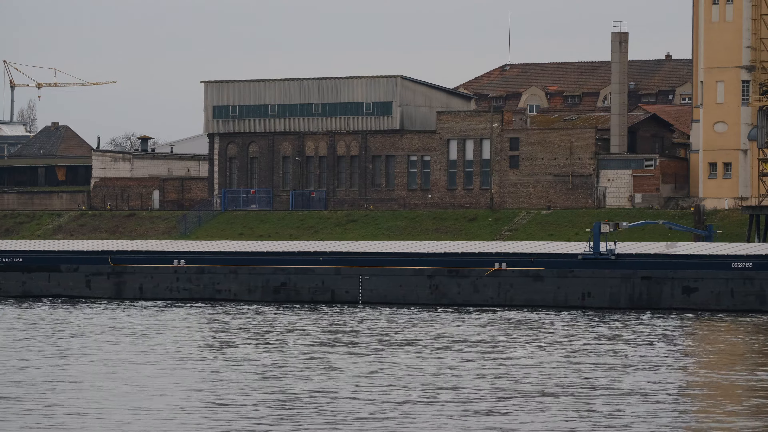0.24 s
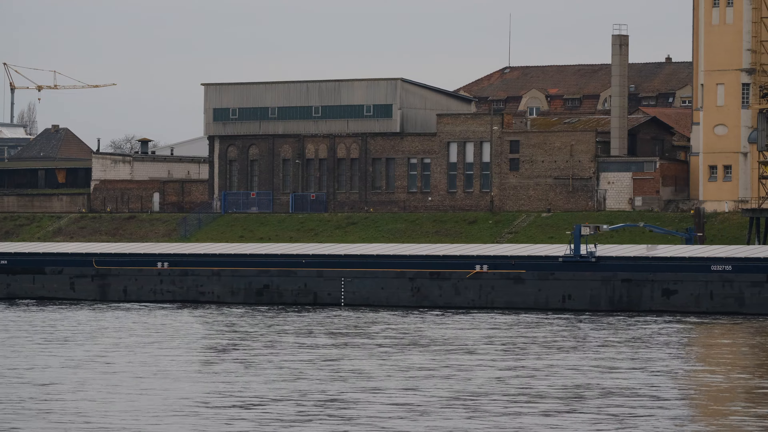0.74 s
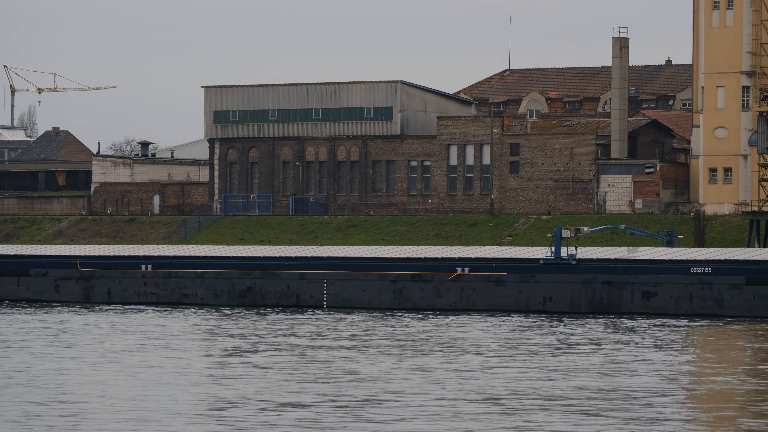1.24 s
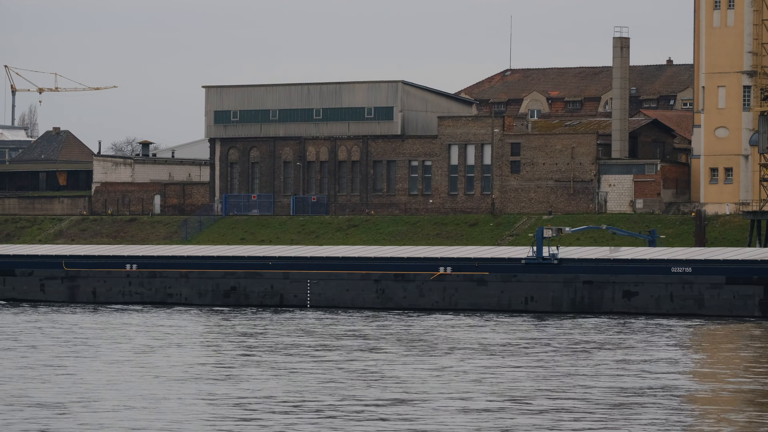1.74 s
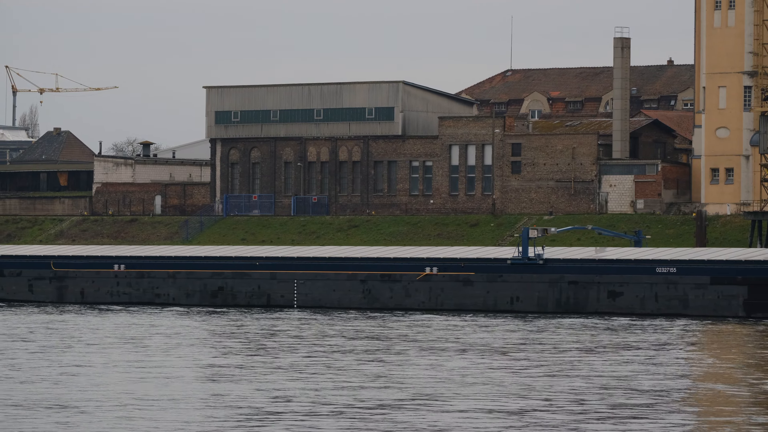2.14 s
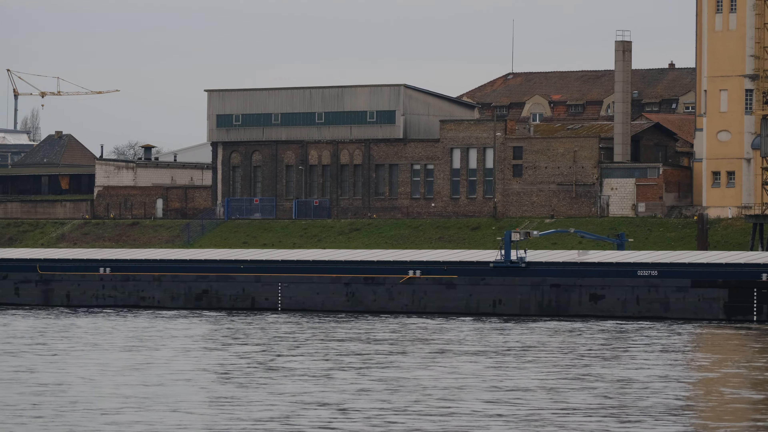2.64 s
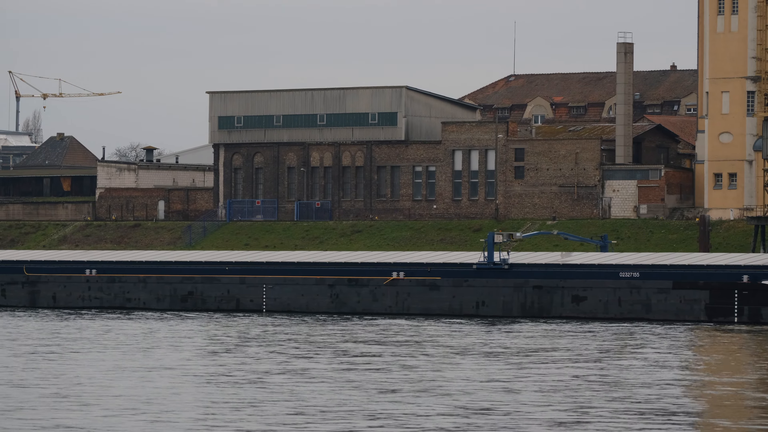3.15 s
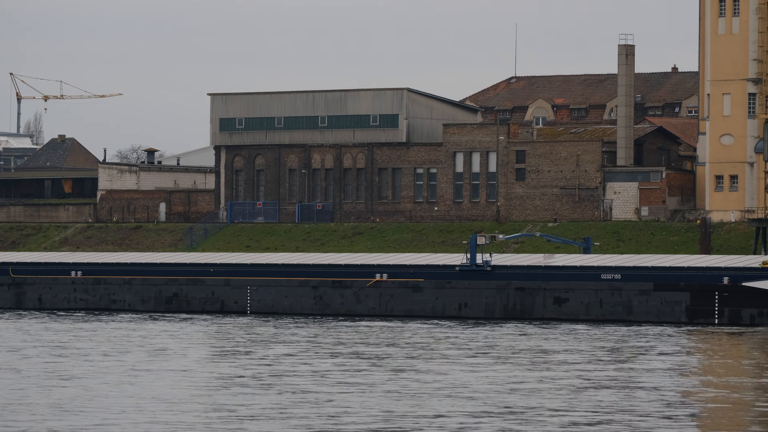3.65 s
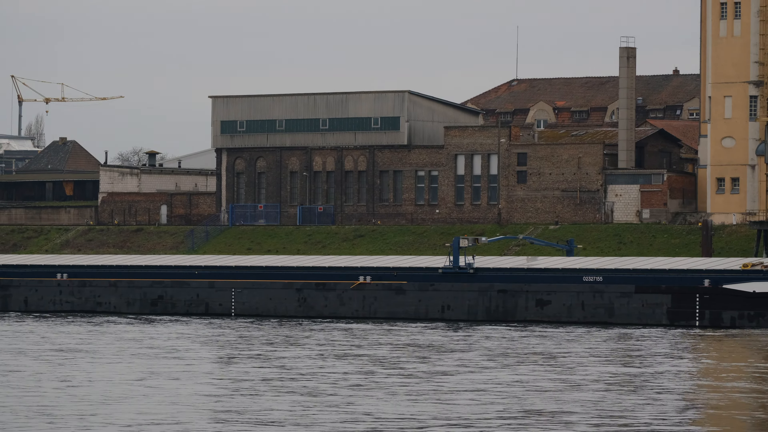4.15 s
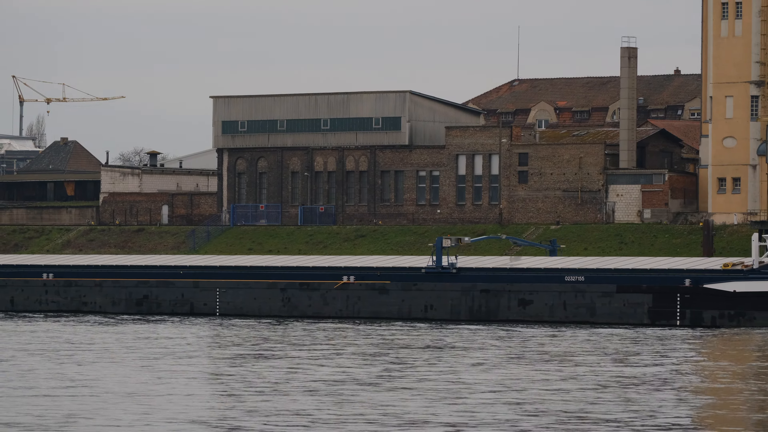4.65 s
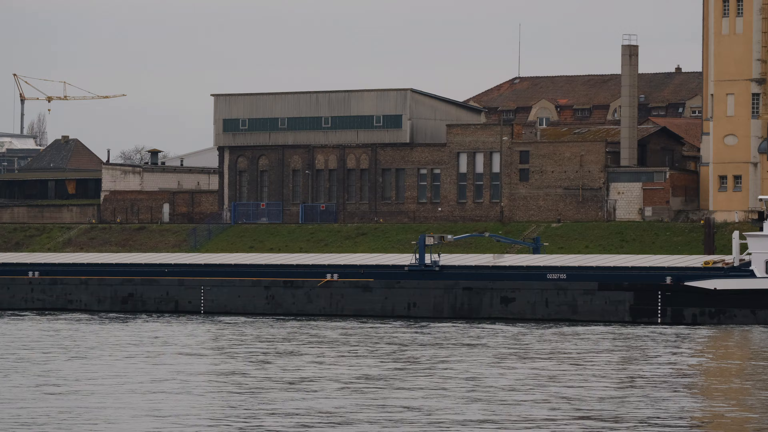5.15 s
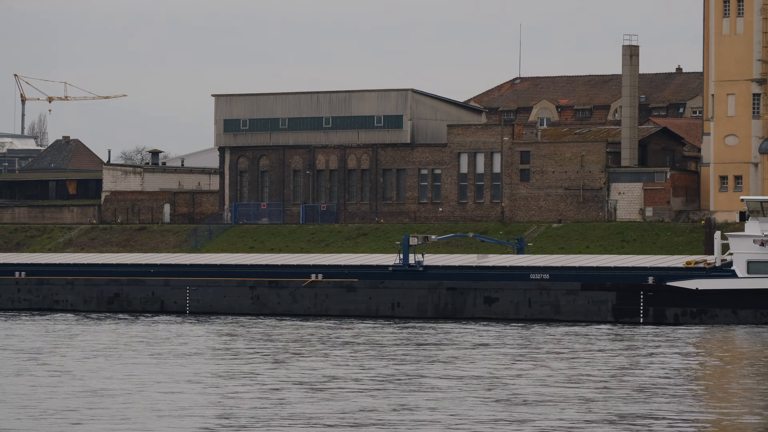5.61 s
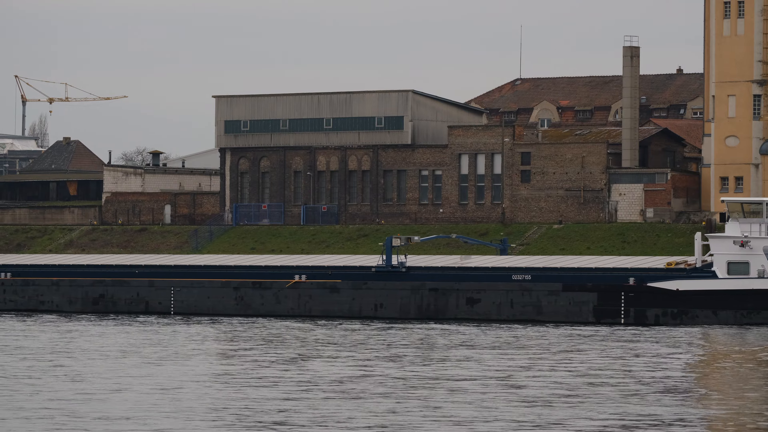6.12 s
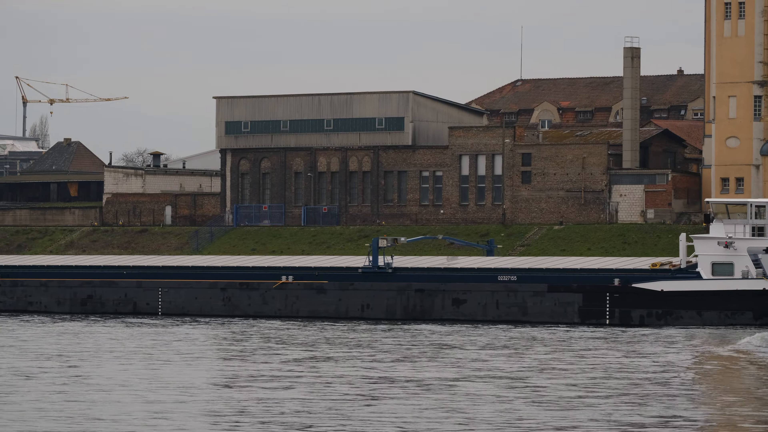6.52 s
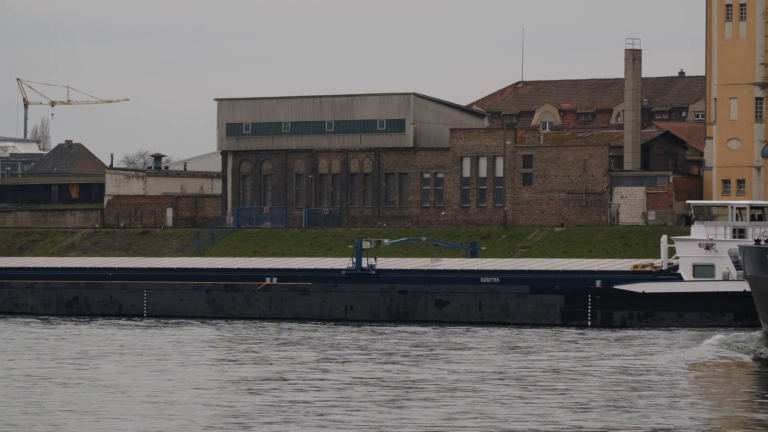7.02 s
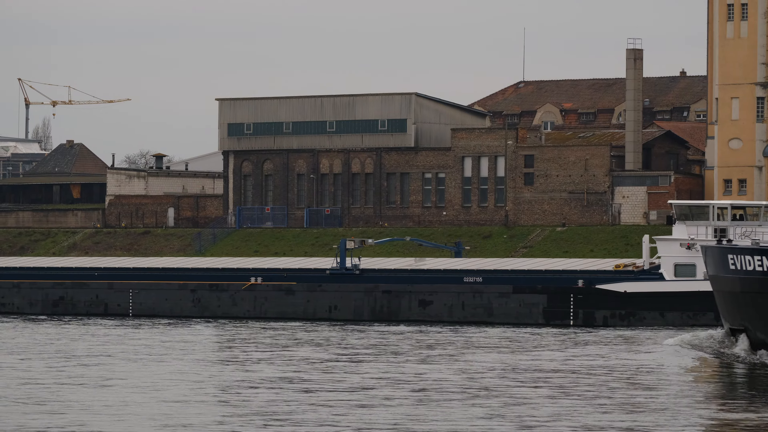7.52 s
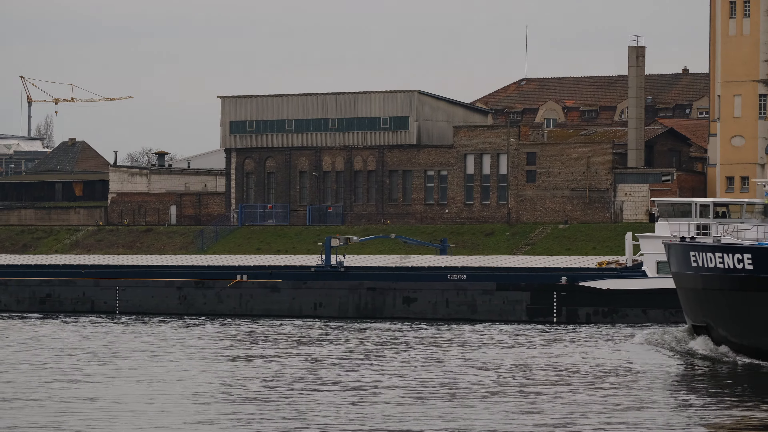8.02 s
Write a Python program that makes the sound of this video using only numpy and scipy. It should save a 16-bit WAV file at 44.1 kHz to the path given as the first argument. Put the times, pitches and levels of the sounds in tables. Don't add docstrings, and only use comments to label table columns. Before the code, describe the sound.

A steady low drone from marine diesels across open water, deep and slightly pulsing, begins at full presence and continues throughout. Hollow funnel resonance and broadband engine-room roar sit over the hum, drifting gently in level. The second engine's low note strengthens early on. Water hiss is very quiet and dark. Outdoor riverbank perspective at a distance, wide only in the mids and highs, with the roar leaning right.

```python
import sys
import numpy as np
from scipy import signal
from scipy.fft import rfft, irfft, next_fast_len
from scipy.io import wavfile
from scipy.ndimage import uniform_filter1d, minimum_filter1d

SR = 44100
rng = np.random.default_rng(int(sys.argv[2]) if len(sys.argv) > 2 else 0)


def voltage_ratio(level):
    return 10 ** (np.asarray(level, float) / 20)


def wav_record(signal):
    frames = np.transpose(np.atleast_2d(signal))
    bounded = np.clip(frames, -1, 1)
    quanta = np.round(bounded * 32767).astype(np.int16)
    wavfile.write(sys.argv[1], SR, quanta)


N = 364707

# [t/s, speed/(cycles per s)]
SLOW_SPEED = [(0, 4.2475), (8.27, 4.2535)]
FAST_SPEED = [(0, 13.078), (8.27, 13.058)]
GENERATOR_SPEED = [(0, 25.09), (8.27, 25.07)]

SLOW_LOUD_ORDERS = [8, 11, 13, 16]
FAST_LOUD_ORDERS = [6, 7, 9, 15]
GENERATOR_ORDERS = [2, 3]
# [rms level/dB at MID_S, growth/(dB per s), water echo share/0-1, dip/s, dip period/s]
SLOW_LOUD = [(-45.3, .64, .1, .2, 6.0), (-46.2, .17, .55, 5.2, 9.5), (-44.9, -.11, .45, 3.0, 10.5),
             (-40.1, .12, .15, 3.0, 3.2)]
FAST_LOUD = [(-37.4, -.3, .13, 4.0, 2.6), (-47.0, .6, .15, 2.2, 6.0), (-53.7, 1.32, .45, 3.6, 4.1),
             (-56.0, 1.1, .35, 4.2, 5.0)]
GENERATOR_LOUD = [(-43.8, -.26, .1, 1.4, 4.1), (-58.3, 1.7, .4, 1.6, 3.5)]

# [multiple of the crank cycle], then [rms level/dB]
SLOW_FAINT_ORDERS = [5, 7, 10, 14, 15, 17, 19, 20, 27, 28, 33]
SLOW_FAINT_DB = [-65, -54.5, -62, -58, -50, -60, -55, -52.5, -59, -59, -58]
FAST_FAINT_ORDERS = [2, 3, 4, 8, 10, 11, 12, 13, 14, 18, 19, 22]
FAST_FAINT_DB = [-71, -60, -64, -55, -62, -53, -61, -58, -58, -54, -57, -61]
# [multiple of the shaft speed], then [rms level/dB]
HUM_ORDERS = [16.1, 20, 24.65, 40]
HUM_DB = [-63.5, -65.0, -65.5, -66.0]
# [multiple of the crank cycle], then [rms level/dB]
GEAR_ORDER = [42]
GEAR_DB = [-66]
SHADOWED = [
    [1],
    [.4],
    [0],
    [0],
]

# [f/Hz, rms level/dB]
WHINE = [(7515, -104), (11514.3, -113), (13183.7, -109)]

# [f/Hz, width/Hz]
DUCTS = [(497, 34), (203, 36), (770, 40)]
# [rms level/dB at MID_S, growth/(dB per s), water echo share/0-1, dip/s, dip period/s]
DUCT_LEVELS = [(-57.5, -2.5, .25, 1.25, 1.8), (-49.3, .35, .2, 4.6, 3.1), (-57.0, 0, .15, 3.0, 4.6)]

# [f/Hz, level/(dB per Hz)]; the dip
# near 340 Hz is the echo off the water
NOISE_COLOUR = [(14, -85), (20, -82), (27, -71.5), (40, -74.5), (58, -61.5), (75, -63.5), (100, -61), (125, -63),
                (150, -61.5), (200, -60.5), (245, -61.5), (290, -63.5), (335, -72),
                (400, -67), (450, -68), (520, -71), (560, -70.5), (620, -68.5), (770, -69.5), (900, -71.5),
        (1100, -74.5), (1300, -78.5), (1750, -79.5), (2100, -84), (2700, -88), (3100, -92.5),
                (3600, -93), (4200, -95.5), (4800, -99.7), (5300, -100.9), (5900, -103.5), (6600, -107.4),
        (7500, -111.6), (8500, -113.6), (10000, -119.5), (12200, -122), (13200, -120.5), (13700, -117.5),
        (14100, -122), (15600, -124.5)]
# [level/dB, growth/(dB per s), water echo share/0-1, dip/s, dip period/s]
SWELL = [
    (0, -0.08, .06, 2.2, 2.7),
    (0, -0.28, 0.19, 1.5, 12.0),
    (0, -0.66, 0.28, 2.0, 14.5),
    (0, -.15, 0.26, 3.06, 15.0),
    (0, -0.25, 0.08, 2.0, 6.3),
    (0, .08, 0.07, 2.6, 6.0),
]
SWELL_HZ = [200, 480, 800, 1200, 3000, 8000]
# [f/Hz, share/0-1]
DIRECT = [(500, .98), (900, .9), (1200, .64), (2700, .6), (3400, .45), (4300, .58), (5200, .33),
          (6000, .42), (7500, .25), (9500, .36), (12000, .15), (15000, .12)]
# [f/Hz, level/dB]
SHADE = [(60, 0.0), (92, 0.0), (140, 0.0), (210, 0.0), (330, 0.0), (500, -0.5), (770, -1.5), (1170, -3.5),
         (1790, -3.5), (2740, -3.0), (4190, -0.5), (6410, -1.0), (9810, -0.5), (15000, 1.5)]
# [f/Hz, phase/radians]
LEFT_TRAILS = [(400, 0.0), (1000, .55), (2100, 1.8), (2900, 1.4), (3900, 3.0), (5000, 3.4), (5900, 5.3),
               (7300, 6.2), (9400, 9.2), (13000, 9.1), (15000, 9.0)]

MID_S = 4


def in_time(rows):
    s, *columns = np.transpose(rows)
    return [np.interp(np.arange(N) / SR, s, column) for column in columns]


def at_hz(points, hz):
    point_hz, values = np.transpose(points)
    return np.interp(np.log(hz), np.log(point_hz), values)


def drift(rate_hz):
    hop = 100
    r = np.exp(-2 * np.pi * rate_hz * hop / SR)
    coarse = rng.standard_normal(N // hop + 1002)
    slow = signal.lfilter([1], [1, -2 * r, r * r], coarse)[1000:]
    slow = (slow - slow.mean()) / slow.std()
    return np.interp(np.arange(N) / hop, np.arange(len(slow)), slow)


def fading(rows):
    level_db, growth, echo, dip_s, period_s = np.transpose(rows)[:, :, None]
    s = np.arange(0, N + 400, 400) / SR
    echo = np.clip(echo, 0, .9)
    turn = 2 * np.pi * (s - dip_s) / period_s
    echo_db = 10 * np.log10(1 + echo ** 2 - 2 * echo * np.cos(turn))
    db = level_db + growth * (s - MID_S) + echo_db
    return np.array(in_time(np.vstack([s, db]).T))


def orders_of(speed, orders, levels_db, wander_db, jitter):
    crank = 2 * np.pi * np.cumsum(in_time(speed)[0]) / SR
    out = np.zeros(N)
    for order, level_db in zip(orders, levels_db):
        phase = order * crank + rng.uniform(0, 2 * np.pi) + jitter * drift(1.5)
        level = voltage_ratio(level_db + wander_db * drift(.8))
        out += np.sqrt(2) * level * np.sin(phase)
    return out


def slow_diesel():
    loud = orders_of(SLOW_SPEED, SLOW_LOUD_ORDERS, fading(SLOW_LOUD), wander_db=.2, jitter=.05)
    faint = orders_of(SLOW_SPEED, SLOW_FAINT_ORDERS, SLOW_FAINT_DB, wander_db=1.5, jitter=.2)
    return loud + faint


def hull_shadow():
    hidden_db, clears_s, edge_s = 8.0, 1.75, .35
    return -hidden_db / (1 + np.exp((np.arange(N) / SR - clears_s) / edge_s))


def fast_diesel():
    loud_db = fading(FAST_LOUD) + hull_shadow() * SHADOWED
    loud = orders_of(FAST_SPEED, FAST_LOUD_ORDERS, loud_db, wander_db=.2, jitter=.05)
    faint = orders_of(FAST_SPEED, FAST_FAINT_ORDERS, FAST_FAINT_DB, wander_db=1.5, jitter=.2)
    return loud + faint


def generator_set():
    shaft = orders_of(GENERATOR_SPEED, GENERATOR_ORDERS, fading(GENERATOR_LOUD), wander_db=.2, jitter=.05)
    hum = orders_of(GENERATOR_SPEED, HUM_ORDERS, HUM_DB, wander_db=2.5, jitter=.6)
    return shaft + hum


def electronics_whine():
    out = np.zeros(N)
    for hz, level_db in WHINE:
        out += np.sqrt(2) * voltage_ratio(level_db) * np.sin(2 * np.pi * hz * np.arange(N) / SR)
    return out


def gear_mesh():
    mesh = orders_of(FAST_SPEED, GEAR_ORDER, GEAR_DB, wander_db=2.0, jitter=.5)
    return mesh * [[-.5], [1.3]]


def ducts():
    out = np.zeros(N)
    for (hz, width_hz), level_db in zip(DUCTS, fading(DUCT_LEVELS)):
        r = np.exp(-np.pi * width_hz / SR)
        poles = [1, -2 * r * np.cos(2 * np.pi * hz / SR), r * r]
        once = signal.lfilter([1, 0, -1], poles, rng.standard_normal(N + SR))
        tone = signal.lfilter([1], poles, once)[SR:]
        tone = tone / uniform_filter1d(tone ** 2, size=2500) ** .2
        out += voltage_ratio(level_db) * tone / tone.std()
    return out


def noise_at_ports(hz, size):
    colour = voltage_ratio(at_hz(NOISE_COLOUR, hz)) * np.sqrt(SR / 2)
    direct = np.clip(at_hz(DIRECT, hz), 0, 1)
    straight, left, right = rfft(rng.standard_normal((3, size)))
    straight = np.sqrt(direct) * straight
    left = straight * np.exp(-1j * at_hz(LEFT_TRAILS, hz)) + np.sqrt(1 - direct) * left
    right = straight + np.sqrt(1 - direct) * right
    shade = voltage_ratio(at_hz(SHADE, hz) / 2)
    return colour * np.array([left * shade, right / shade])


def far_noise(patchy_db, flicker_db):
    size = next_fast_len(N)
    hz = np.maximum(np.arange(size // 2 + 1) * SR / size, 1)
    pair = noise_at_ports(hz, size)
    swells = fading(SWELL)
    swells = swells - swells.mean(axis=1, keepdims=True)
    place = np.clip(3 * np.log2(hz / 40), 0, 26)
    swell_place = 3 * np.log2(np.array(SWELL_HZ) / 40)
    out = 0
    for k in range(27):
        band = np.cos(np.pi / 2 * np.clip(place - k, -1, 1)) ** 2
        shares = np.array([np.interp(k, swell_place, row) for row in np.eye(6)])
        gain = voltage_ratio(shares @ swells + patchy_db * drift(0.78) + flicker_db * drift(6.0))
        out = out + gain * irfft(pair * band, size)[:, :N]
    return out


def scene():
    tones = slow_diesel() + fast_diesel() + generator_set() + electronics_whine()
    return tones + gear_mesh() + ducts() + far_noise(patchy_db=0.37, flicker_db=0.48)


def band_limit(x):
    return signal.sosfilt(signal.butter(12, 15735, fs=SR, output="sos"), x)


def record(dry):
    mid, side = (dry[0] + dry[1]) / 2, (dry[0] - dry[1]) / 2
    mono_below = signal.butter(3, 463, "high", fs=SR, output="sos")
    side = signal.sosfiltfilt(mono_below, side)
    knee, squeeze, make_up_db = .075, .3, .35
    peak = -minimum_filter1d(-np.abs(mid), size=600)
    ease = voltage_ratio(make_up_db) * np.maximum(peak / knee, 1) ** -squeeze
    ease = uniform_filter1d(uniform_filter1d(ease, size=300), size=300)
    n = np.arange(N)
    edges = np.clip(np.minimum(n, N + 30 - n) / 90, 0, 1)
    mix = np.array([mid + side, mid - side]) * ease * np.sin(np.pi / 2 * edges) ** 2
    return band_limit(mix)


dry = scene()
out = record(dry)
wav_record(out)
```